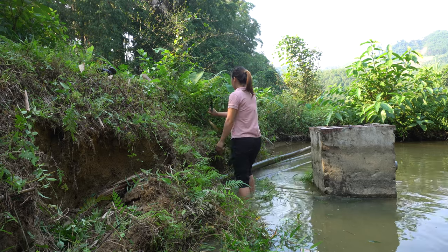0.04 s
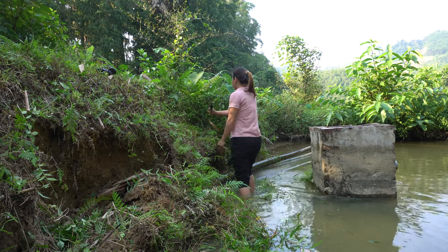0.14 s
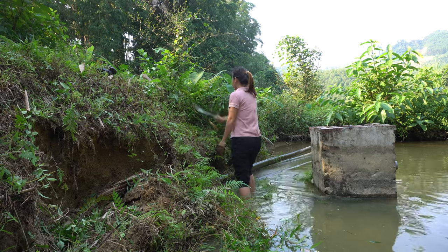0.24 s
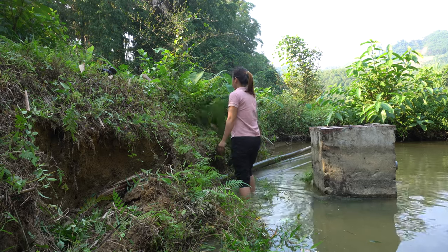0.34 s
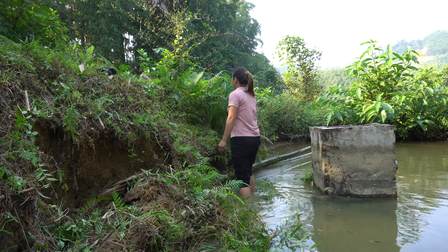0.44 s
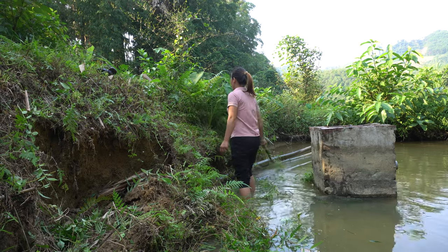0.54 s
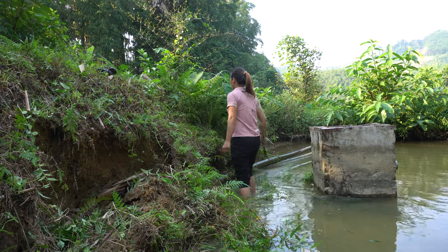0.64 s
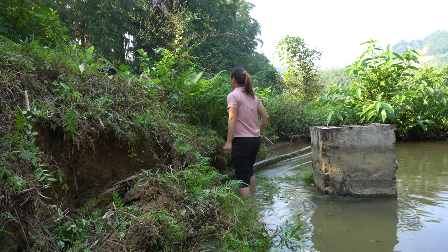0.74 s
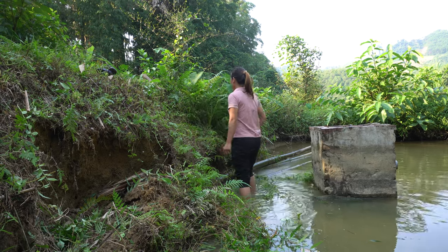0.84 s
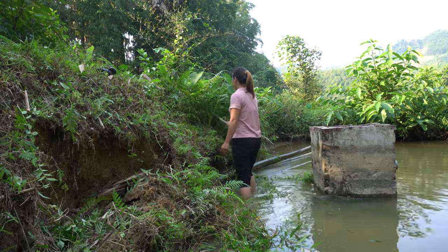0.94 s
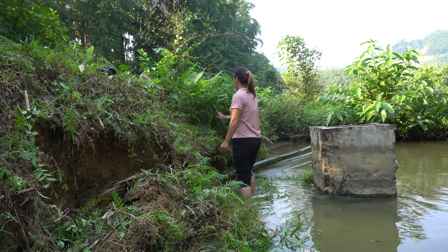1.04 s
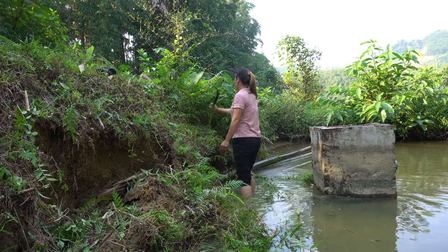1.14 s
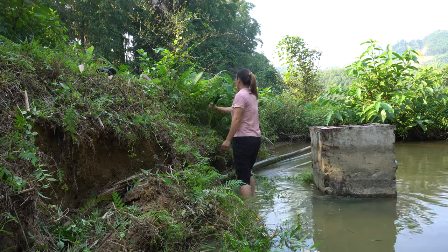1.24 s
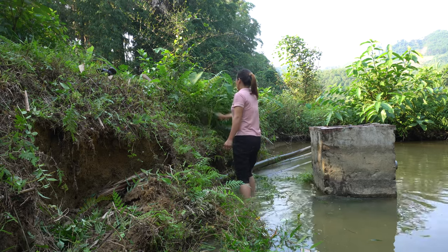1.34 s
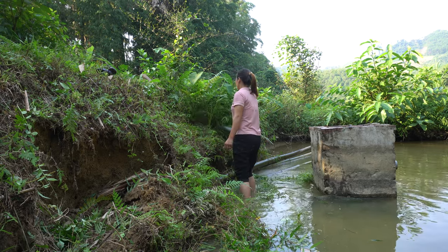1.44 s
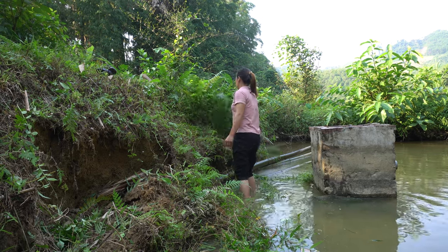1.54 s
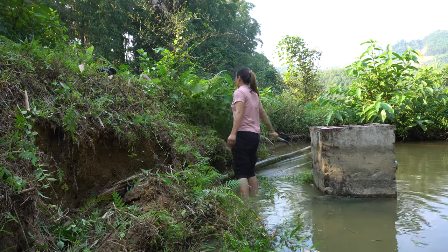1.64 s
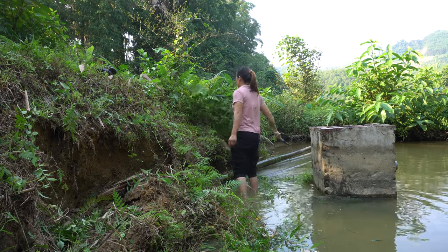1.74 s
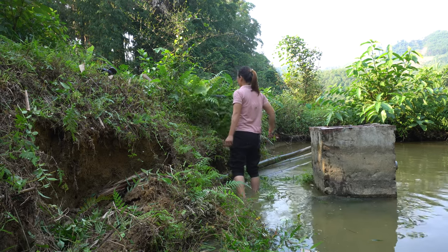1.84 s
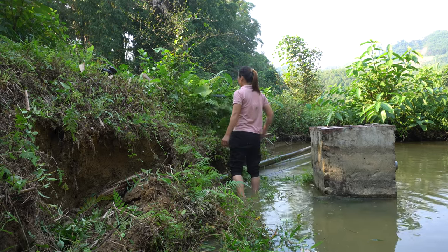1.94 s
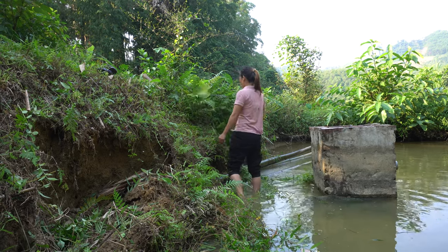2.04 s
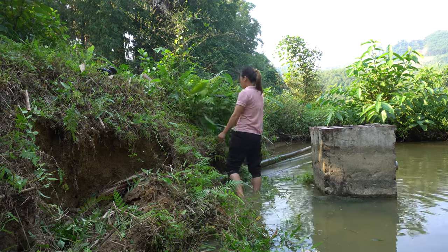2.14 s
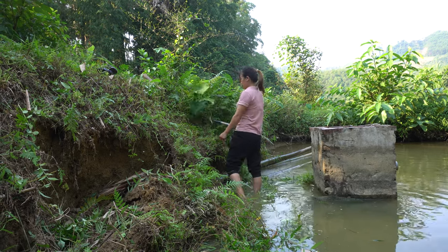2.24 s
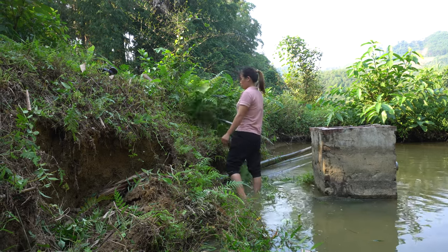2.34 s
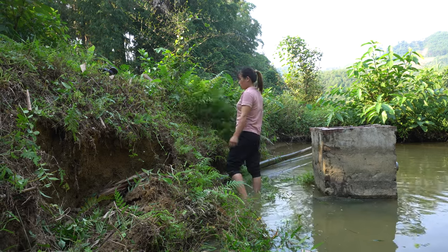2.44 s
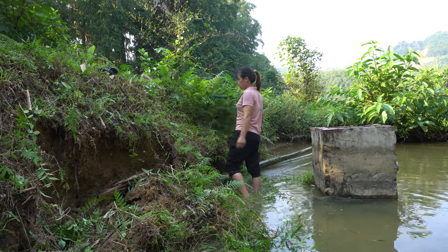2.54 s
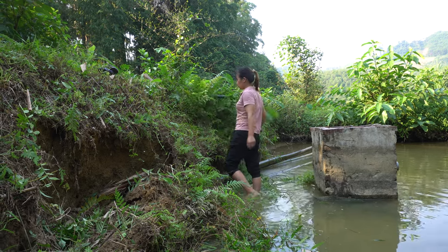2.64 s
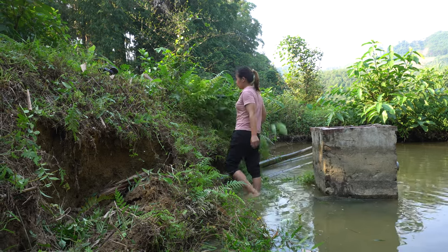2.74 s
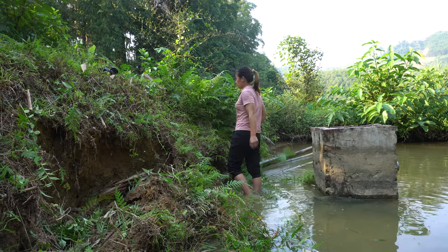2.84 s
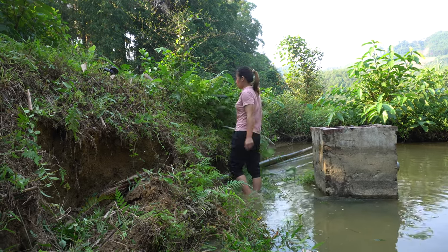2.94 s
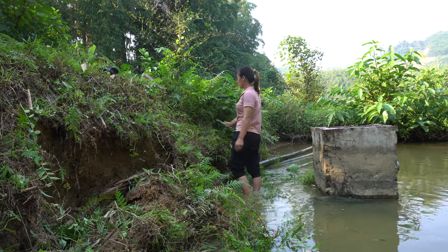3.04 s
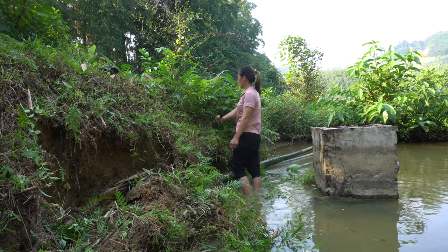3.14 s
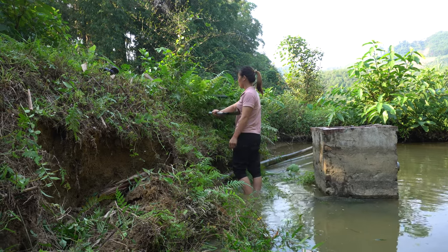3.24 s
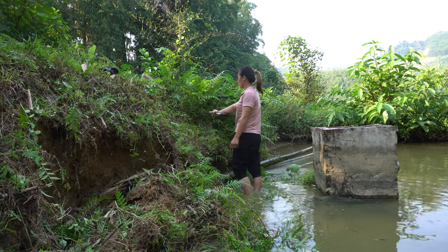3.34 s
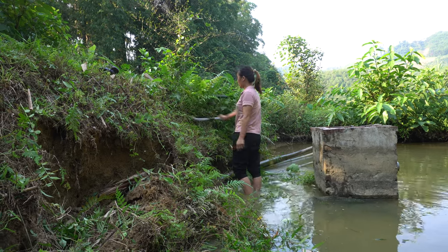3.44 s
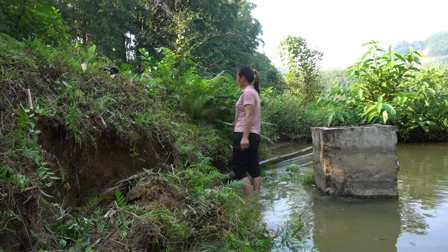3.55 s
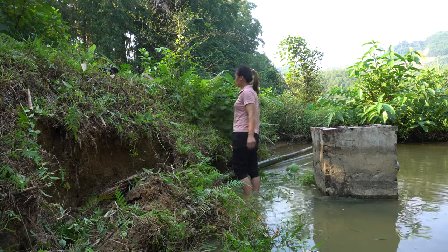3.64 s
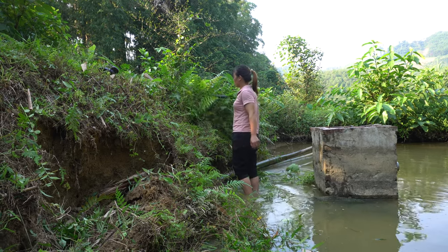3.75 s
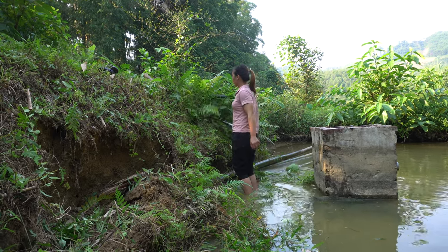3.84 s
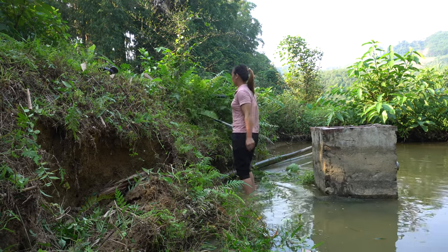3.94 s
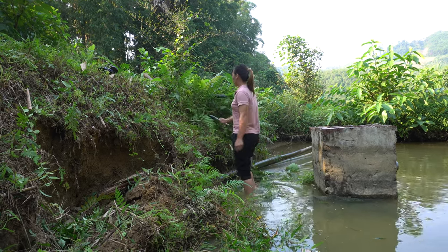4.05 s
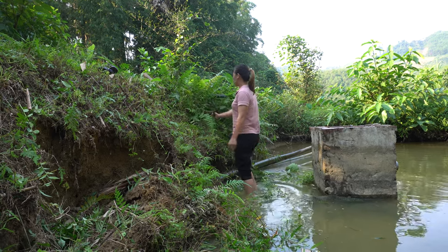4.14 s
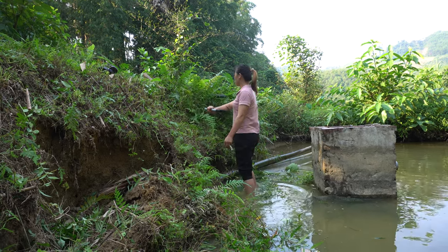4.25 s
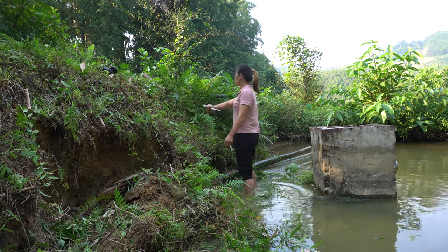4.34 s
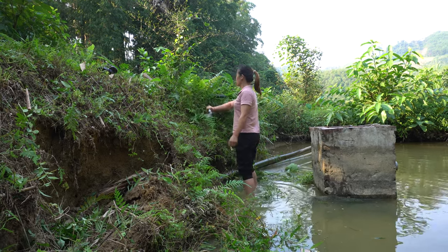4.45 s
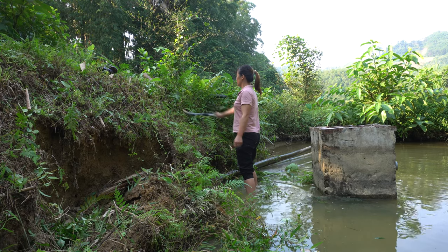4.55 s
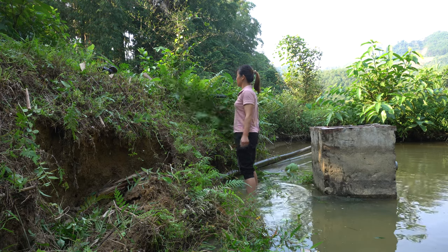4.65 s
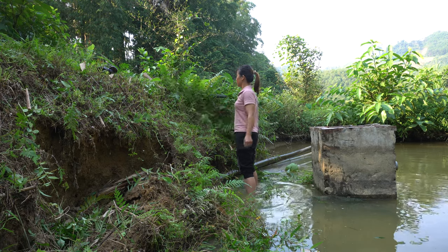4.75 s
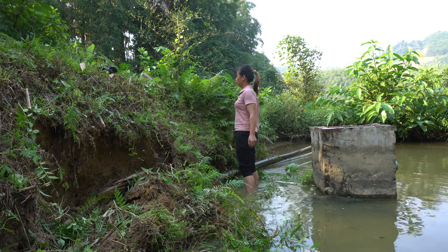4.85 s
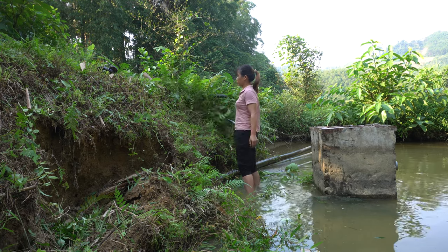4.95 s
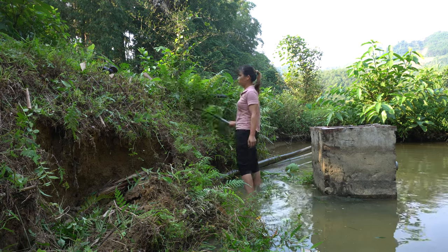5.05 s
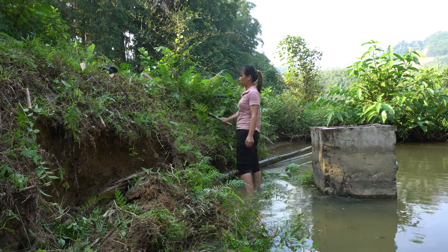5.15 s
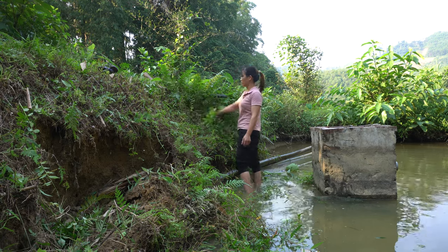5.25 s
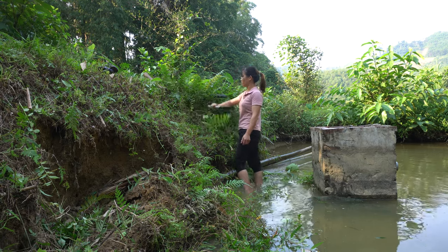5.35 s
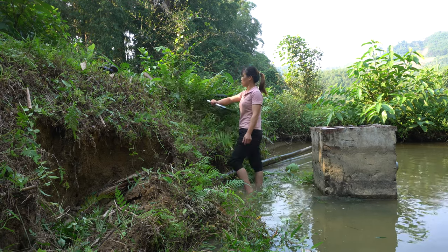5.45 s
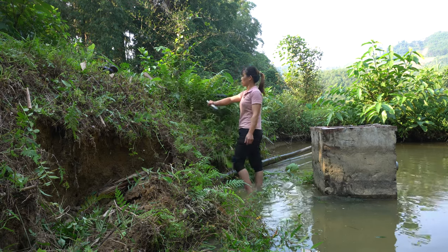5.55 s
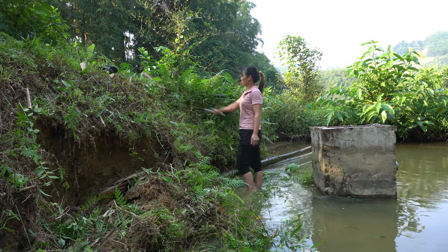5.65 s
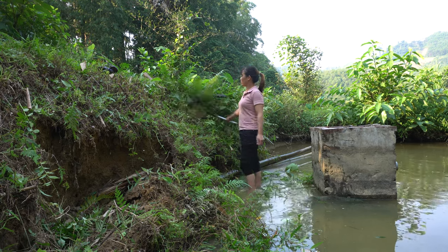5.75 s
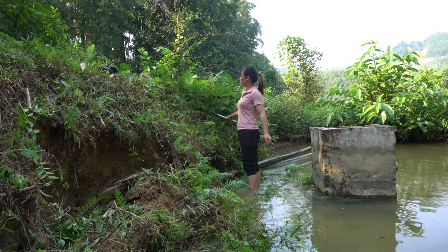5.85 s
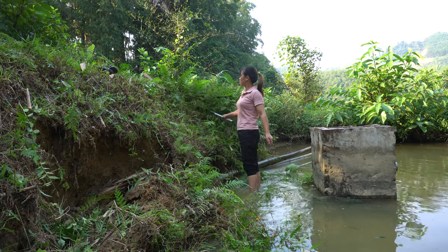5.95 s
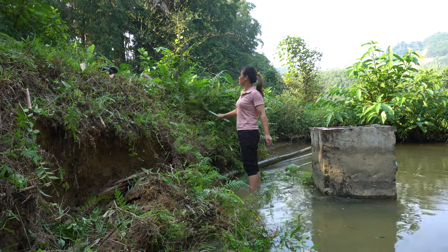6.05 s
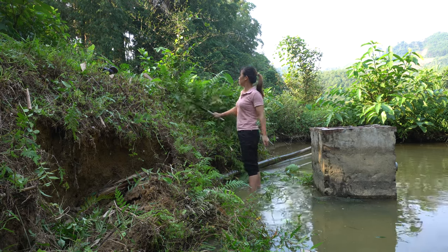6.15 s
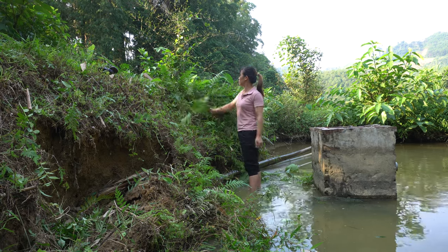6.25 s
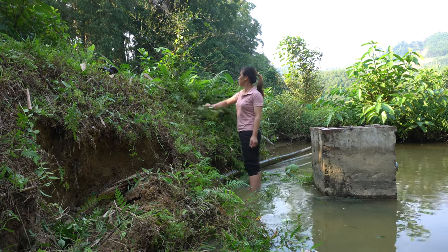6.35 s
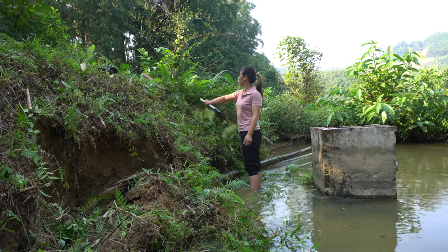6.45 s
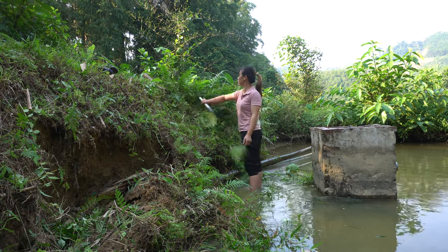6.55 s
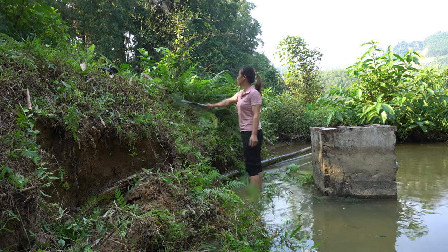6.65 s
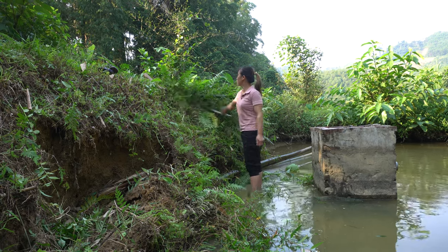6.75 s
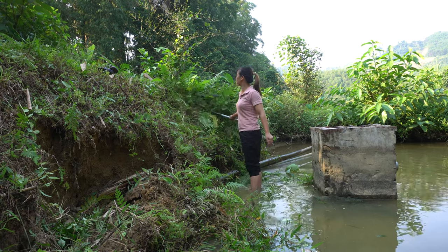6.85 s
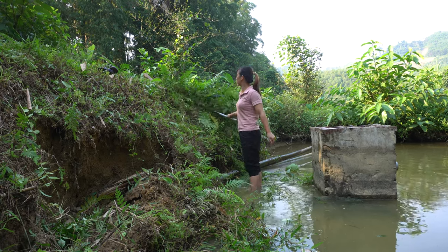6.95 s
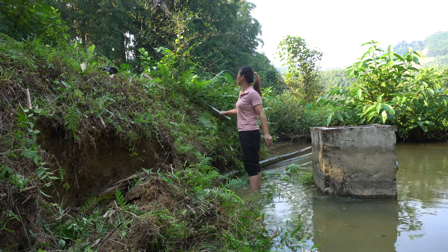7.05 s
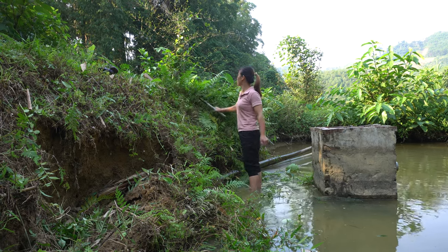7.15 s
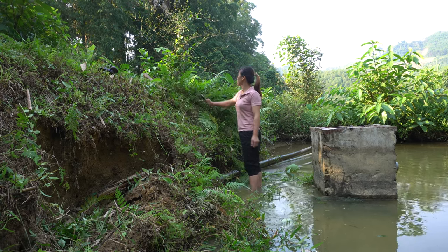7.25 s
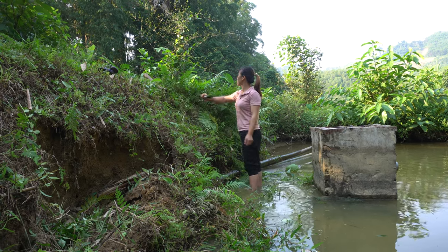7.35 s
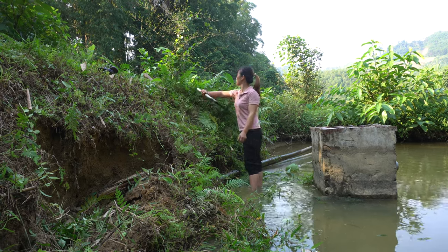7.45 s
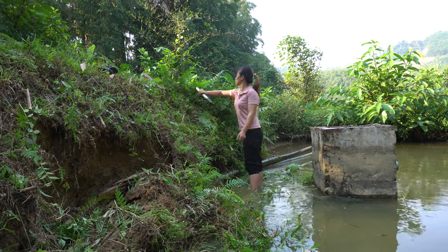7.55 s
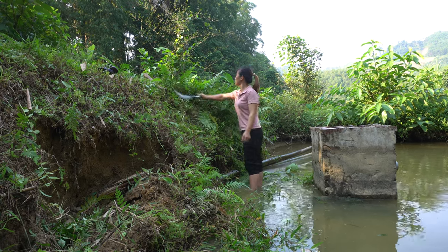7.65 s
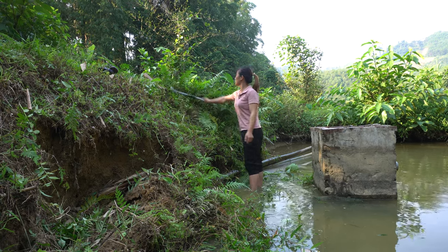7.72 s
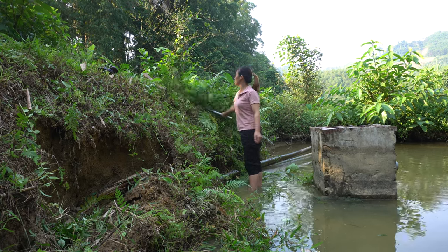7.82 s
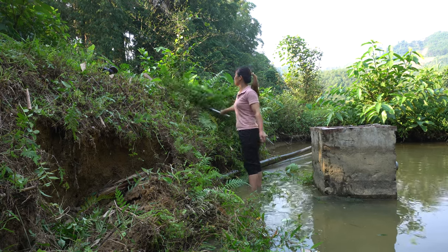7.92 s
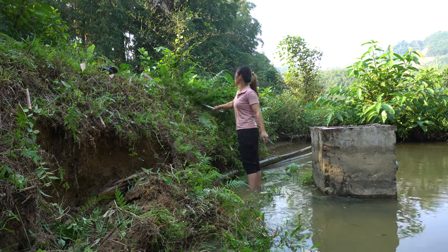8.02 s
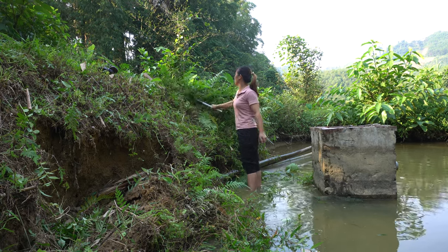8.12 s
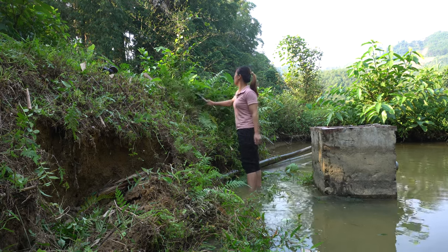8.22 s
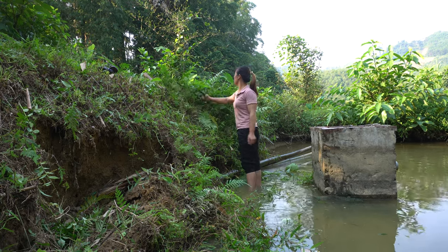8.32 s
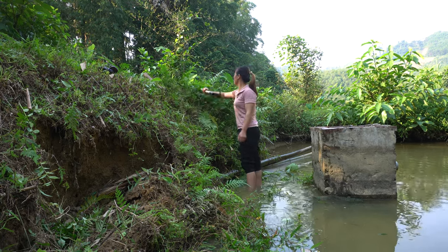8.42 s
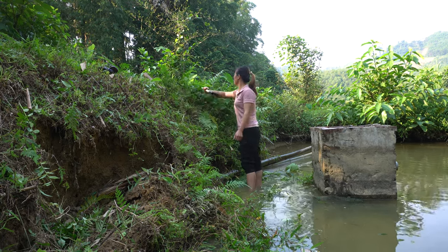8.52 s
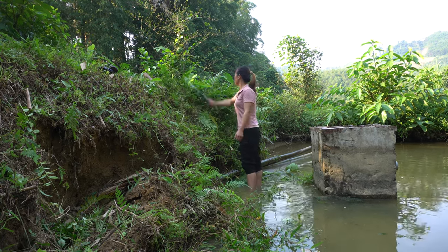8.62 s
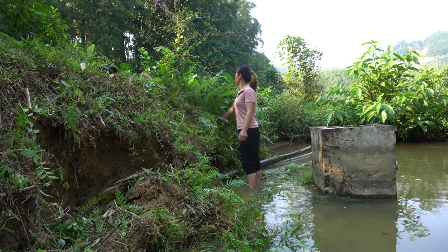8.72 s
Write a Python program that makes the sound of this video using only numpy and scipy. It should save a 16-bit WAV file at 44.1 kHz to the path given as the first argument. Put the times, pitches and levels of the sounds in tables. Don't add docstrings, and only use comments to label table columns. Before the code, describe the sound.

A few metres away and slightly left, a machete chops weeds on an earth bank roughly once a second. Each stroke is a short bright crackle of snapping stems, sometimes with a dull push into soil, followed by falling leaf rustle. Water trickles and gurgles into a hollow tank throughout, drops plop into the pond, and insects hiss faintly around.

```python
import sys
import numpy as np
from scipy import signal
from scipy.fft import rfft, irfft, next_fast_len
from scipy.io import wavfile
from scipy.ndimage import uniform_filter1d, map_coordinates

SR = 44100
rng = np.random.default_rng(int(sys.argv[2]) if len(sys.argv) > 2 else 0)


def voltage_ratio(level):
    return 10 ** (np.asarray(level, float) / 20)


def dump(signal):
    limited = np.clip(np.atleast_2d(signal).T, -1, 1)
    pcm = np.round(limited * 32767).astype(np.int16)
    wavfile.write(sys.argv[1], SR, pcm)


N = 387198


def unit(x):
    return x / np.sqrt(np.mean(x ** 2) + 1e-20)


def along(points, hz):
    f, value = np.transpose(points)
    return np.interp(np.log(hz + 1), np.log(f + 1), value)


def wobble(rate_hz):
    knots = rng.standard_normal(int(N * rate_hz / SR) + 4)
    return map_coordinates(knots, [np.arange(N) * rate_hz / SR])


def filtered(x, response):
    size = next_fast_len(N + 8192)
    return irfft(rfft(x, size) * response(np.fft.rfftfreq(size, 1 / SR)), size)[..., :N]


def resonances(modes):
    def response(f):
        total = 0
        for k, (pitch_hz, width_hz, level_db) in enumerate(modes):
            damping = 1j * f * width_hz
            total = total + (-1) ** k * voltage_ratio(level_db) * damping / (pitch_hz ** 2 - f ** 2 + damping)
        return total
    return response


def swells(rows, rest_db):
    t = np.arange(N) / SR
    power = voltage_ratio(rest_db) ** 2
    for s, db, length in rows:
        power = power + voltage_ratio(2 * db) * np.exp(-((t - s) / length) ** 2)
    return np.sqrt(power)


def crackle(per_s, spread_db, life_s, noise, rows=1):
    when = rng.random((rows, N)) < per_s / SR
    size = np.minimum(rng.exponential(1, (rows, N)), 2.6)
    puffs = signal.lfilter([1], [1, -np.exp(-1 / (life_s * SR))], when * voltage_ratio(spread_db * size))
    hiss = rng.standard_normal((2, rows, N))
    return unit(unit(puffs * hiss[0]) + noise * hiss[1])


def patchy(x, depth_db, bands, frames):
    z = signal.stft(x, nperseg=128)[2]
    field = uniform_filter1d(rng.standard_normal(z.shape[1:]), bands, 0)
    field = uniform_filter1d(field, frames, 1)
    field -= field.mean(0)
    return unit(signal.istft(z * voltage_ratio(depth_db * unit(field)), nperseg=128)[1][:, :N])


def puff(centre_hz, sharp, t60, rows=1):
    t = np.arange(700) / SR
    burst = rng.standard_normal((rows, len(t))) * voltage_ratio(-60 * t / t60)
    band = signal.iirpeak(centre_hz, sharp, SR)
    out = signal.lfilter(*band, signal.lfilter(*band, burst))
    return out / np.abs(out[0]).max()


def bank(x, answer_db):
    t = np.arange(1500) / SR
    echo = rng.standard_normal((2, len(t))) * voltage_ratio(-60 * t / 0.031) * (t > .002)
    return voltage_ratio(answer_db) * signal.fftconvolve(x[None], echo / np.linalg.norm(echo[0]), axes=1)[:, :N]


# frequency_hz, likeness [0 to 1]
LIKENESS = [(60, .995), (200, .99), (400, .88), (800, .88), (1400, .72), (3000, .5), (6800, .25),
            (15000, .45)]


def spread(pair):
    def mid_and_side(hz):
        angle = np.arccos(np.clip(along(LIKENESS, hz), -1, 1)) / 2
        return np.array([np.cos(angle), np.sin(angle)])
    mid, side = filtered(pair, mid_and_side)
    return np.array([mid + side, mid - side])


# frequency_hz, level_db [per Hz]
FAR_HISS = [(15, -41), (25, -14), (69, -12), (152, -10), (227, -14.5), (567, -9.5), (826, -6), (945, -11),
            (2010, -6), (2420, -9.5), (15500, -25.5)]


def surroundings():
    swell = voltage_ratio(.8 * wobble(3))
    hiss = unit(filtered(rng.standard_normal((2, N)), lambda hz: voltage_ratio(along(FAR_HISS, hz))))
    chorus = unit(filtered(rng.standard_normal((2, N)), resonances([(6060, 220, 0)])))
    return spread(voltage_ratio(-43.5) * swell * hiss) + voltage_ratio(-58.0 + 0.59 * wobble(33)) * chorus


def bubbles(count):
    draw, k = rng.random((count, 4)), np.arange(600)
    pitch_hz = 650 * 5 ** draw[:, 1:2]
    cycles = pitch_hz * k / SR
    life = voltage_ratio(-60 * cycles / 22) * (1 - np.exp(-cycles / 0.85))
    notes = life * np.sin(2 * np.pi * cycles * (1 + 0.0093 * cycles))
    notes *= voltage_ratio(-2.5 * np.log(draw[:, 2:3] + 0.11))
    notes *= np.sqrt(pitch_hz)
    where = (draw[:, :1] * N).astype(int) + k
    pan = 2 * draw[:, 3:] - 1
    sides = [np.bincount(where.ravel(), (notes * g).ravel(), N + 600)[:N] for g in (1, pan)]
    return unit(np.array(sides))


# start_s, level_db
STREAM = [(0.0, -55), (0.51, -48), (0.85, -55), (1.46, -51.5), (1.69, -51.5), (2.17, -50), (2.47, -51.5),
          (2.74, -50), (4.08, -56.5), (4.38, -51.5), (5.23, -52), (5.62, -49), (5.87, -54.5), (7.36, -50),
          (7.6, -54.5), (7.95, -55), (8.26, -57), (8.78, -49)]
# pitch_hz, width_hz, level_db
TANK_AIR = [(215, 23.8, 8), (254, 101, -0.5), (145, 68, -13.5)]
# pitch_hz, width_hz, level_db
DEEP_AIR = [(72.8, 5.9, -7), (108, 7.7, -12)]
# pitch_hz, width_hz, level_db
PIPE_AIR = [(749, 17.5, 1), (843, 58, -2.5), (1075, 31, -3), (1854, 280, -7), (2180, 35, -1.5),
            (2866, 270, -5)]
# start_s, level_db, length_s
BOOMS = [
    (1.1, -54, 0.22),
    (1.5, -52, 0.05),
    (2.88, -47.5, 0.051),
    (5.75, -52.5, 0.11),
    (6.31, -51, 0.042),
    (6.73, -49.5, .05),
    (7.8, -47, .07),
    (8.33, -49, 0.11),
]
# start_s, level_db, length_s
TANK_GURGLES = [(.39, -51, .06), (1.02, -60, 0.029), (1.27, -45.5, 0.031), (2.0, -47, 0.41),
                (3.04, -40.5, 0.12), (3.84, -44.5, 0.03), (3.99, -46, 0.017), (4.25, -48, 0.017),
                (4.45, -46, 0.15), (5.0, -45.5, 0.033), (5.96, -42.5, 0.031), (6.4, -43.5, 0.093),
                (6.93, -48, 0.14), (8.29, -43, 0.029)]


def tank():
    flow_db = np.interp(np.arange(N) / SR, *np.transpose(STREAM))
    lumps = rng.standard_normal((2, N))
    boom = unit(filtered(lumps, lambda hz: resonances(DEEP_AIR)(hz) / (1 + (hz / 140) ** 4)))
    boom = swells(BOOMS, rest_db=-57.5) * voltage_ratio(1.6 * wobble(4.4)) * boom
    surge = voltage_ratio(1.5 * wobble(14))
    hum = unit(filtered(lumps * surge, lambda hz: resonances(TANK_AIR)(hz) / (1 + (hz / 330) ** 4)))
    hum = voltage_ratio(flow_db + 3 + 2.2 * wobble(6)) * hum
    splashes = crackle(per_s=350, spread_db=3, life_s=.003, noise=1.1, rows=2)
    splash = unit(filtered(splashes + .42 * bubbles(count=1400), resonances(PIPE_AIR)))
    splash_gain = voltage_ratio(0.15 * (flow_db - flow_db.mean()) + 1.3 * wobble(9))
    splash = swells(TANK_GURGLES, rest_db=-48.5) * splash_gain * patchy(splash, 2.5, 1, 40)
    return spread(boom + hum + splash)


# start_s, level_db [peak], pitch_hz [bubble]
BIG_DROPS = [(0.0884, -21.5, 2110), (1.251, -20, 2450), (1.6593, -24, 1950), (2.2504, -27, 2100),
             (2.429, -22, 1640), (2.6554, -25.5, 2800), (3.037, -28, 3100), (3.7654, -25, 2060),
             (3.7835, -21.5, 3150), (4.185, -22, 2610), (4.2735, -24, 1900), (4.299, -25, 1500),
             (4.5883, -27, 2100), (5.1424, -23, 2650), (5.1675, -17.5, 3020), (5.201, -23, 2050),
             (5.2938, -23, 3040), (5.3533, -21, 2820), (5.5247, -24.5, 2240), (6.0928, -16.5, 3770),
             (6.353, -18, 3240), (6.419, -20.5, 2920), (6.6077, -19, 2740), (6.647, -25, 3030),
             (7.2648, -22.5, 3550), (8.0134, -17, 3280), (8.3109, -20.5, 1720), (8.3586, -24.5, 2930),
             (8.4067, -12.5, 1950), (8.471, -27, 2180)]
# start_s, level_db [peak], pitch_hz [tick]
SMALL_DROPS = [(.0234, -40.5, 5040), (.132, -42.5, 4200), (.214, -39, 5700), (.7047, -36, 9790),
               (.7158, -36, 4310), (.8094, -39, 7300), (1.3433, -42, 6140), (1.8087, -36.5, 4870),
               (2.3267, -35.5, 6750), (2.37, -34, 9560), (4.3344, -40, 6900), (4.4774, -39, 8970),
               (4.849, -37.5, 4010), (4.9553, -37.5, 6360), (1.2516, -38.5, 4480), (5.6547, -43, 5320),
               (5.676, -36, 5290), (6.1469, -39.5, 4220), (6.5545, -40, 8040), (6.938, -37.5, 6340),
               (7.1131, -40, 4530), (7.1625, -37, 5970), (7.5153, -36, 5700), (7.631, -36.5, 8650),
               (8.111, -39, 5400), (8.1808, -34.5, 4910), (8.5008, -39.5, 4080), (8.5503, -38.5, 6200),
               (8.6054, -35.5, 9000), (8.649, -41, 7820)]
# start_s, level_db [peak], pitch_hz [tick]
FINE_SPRAY = [(0.1954, -31, 4270), (0.55, -30, 10700), (0.6778, -34, 8340), (0.9012, -33, 9780),
              (1.023, -30, 9080), (1.0435, -31, 4660), (1.1086, -28.5, 9170), (1.9848, -31, 5220),
              (2.09, -29, 6300), (2.2706, -34, 5580), (2.7768, -28.5, 5140), (2.9012, -33, 9550),
              (3.1008, -30, 8340), (3.1217, -30.5, 6210), (4.1727, -26, 10400), (4.9984, -29.5, 6150),
              (5.0728, -31, 11500), (5.212, -31, 8930), (5.3836, -31, 5670), (5.918, -27, 9600),
              (5.971, -34, 4710), (6.299, -29, 5980), (6.4564, -29, 5170), (7.1406, -29, 5900),
              (7.2543, -32, 4000), (7.2914, -29.5, 4920), (7.402, -32, 5610), (7.6888, -31, 5450),
              (8.0957, -28, 8240), (8.289, -28.5, 4670)]


def all_drops():
    rows = []
    for s, db, hz in BIG_DROPS:
        rows.append((s, db, hz, -37 + 0.1 * (db + 7.5), 6200 * voltage_ratio(rng.normal(0, 1.4))))
    spray = [(s, db - 10.5, hz) for s, db, hz in FINE_SPRAY]
    for s, db, hz in SMALL_DROPS + spray:
        bubble_db = db + 6 + rng.normal(0, 3.6)
        rows.append((s, bubble_db, 2220 * voltage_ratio(rng.normal(0, 2.3)), db, hz))
    return rows


def drops():
    out, t = np.zeros((2, N + SR)), np.arange(700) / SR
    mid_side = np.array([[1], [.3]])
    for s, db, bubble_hz, tick_db, tick_hz in all_drops():
        cycles = bubble_hz * t
        life = (1 - np.exp(-cycles / .35)) * np.exp(-(cycles / 3.8) ** 2)
        bubble = life * np.sin(2 * np.pi * cycles * (0.796 + 0.065 * cycles))
        tick = puff(tick_hz, sharp=1.0, t60=.02, rows=2)
        mist = voltage_ratio(-10 + rng.normal(0, 4)) * puff(13000, sharp=1.2, t60=.014, rows=2)
        here = out[:, round(s * SR):][:, :len(t)]
        here[0] += voltage_ratio(db - 3.0) * bubble
        here += voltage_ratio(tick_db + 10.5) * (tick + mist) * mid_side
    mid, side = out
    return np.array([mid + side, mid - side])[:, :N] + bank(mid, answer_db=-2.5)


# start_s, level_db [peak], t60_s
EARTH_HITS = [
    (0.334, -34.5, 0.98),
    (1.468, -29, 0.48),
    (2.986, -38, 0.12),
    (3.553, -41, 0.36),
    (4.639, -43, 0.16),
    (5.74, -42, 0.13),
    (6.728, -36, 0.68),
    (7.788, -33, 0.78),
    (8.711, -35, 0.16),
]


def thuds():
    out, t = np.zeros(N + SR), np.arange(9000) / SR
    dull = signal.butter(2, [95, 330], "bandpass", fs=SR, output="sos")
    for s, db, t60 in EARTH_HITS:
        push = rng.standard_normal(len(t)) * voltage_ratio(-60 * t / t60) * (1 - np.exp(-t / 0.0025))
        push = signal.sosfilt(dull, push)
        out[round(s * SR):][:len(t)] += voltage_ratio(db) * push / np.abs(push).max()
    return out[:N]


# frequency_hz, left_minus_right_db
LEFT_TILT = [(60, 8), (150, -2), (380, 4), (950, -0.5), (2380, 0.5), (5980, 6), (15000, 2.5)]


def leftward(mono, scatter):
    tilt = lambda hz: voltage_ratio(along(LEFT_TILT, hz) / 2 * np.array([[1], [-1]]))
    return filtered(np.array([mono + scatter, mono - scatter]), tilt)


# start_s [bite], level_db [crackle at bite], rise_s, drag_s, leave_db [crackle as blade leaves]
SLASHES = [
    (0.363, -23, 0.023, 0.16, -40),
    (1.467, -23, 0.019, 0.052, -24.5),
    (2.52, -35, 0.3, 0.26, -47),
    (3.558, -22.5, 0.016, 0.088, -30),
    (4.639, -21, 0.045, .11, -33.5),
    (5.733, -25, 0.043, 0.051, -22),
    (6.734, -21, 0.056, 0.11, -31.5),
    (7.777, -24.5, 0.034, .07, -23),
    (8.732, -20.5, 0.037, 0.053, -27),
]


def stroke_gains():
    gains, t = np.zeros((3, N)), np.arange(N) / SR
    touch_db, leave_db_per_s, settle_db_per_s = -53.5, 240, 41
    for s, bite_db, rise, drag, leave_db in SLASHES:
        times = [s - 2 * rise, s, s + drag, s + drag + 1]
        levels = [2 * touch_db - bite_db, bite_db, leave_db, leave_db - leave_db_per_s]
        db = np.interp(t, times, levels)
        after = np.maximum(t - s, 0)
        gains[0] += voltage_ratio(db + 1.5 * np.exp(-after / 0.019))
        gains[1] += voltage_ratio(db - 6.5 - 3 * np.exp(-after / 0.077))
        settle_db = -39 + 0.64 * (bite_db + 21.5)
        gains[2] += (t > s) * voltage_ratio(settle_db - settle_db_per_s * np.maximum(after - drag, 0))
    return gains


# frequency_hz, level_db [per Hz]
STEM_COLOUR = [(59, -42), (100, -6.5), (220, 2), (380, -14), (500, -1.5), (790, 0.5), (1300, -2.5),
               (2600, 2), (3700, -2.5), (6000, -4.5), (9500, -4), (12500, -4.5), (14500, -3.5), (15800, -8)]
# start_s, level_db, length_s
LEAF_BRUSHES = [(.75, -47, 0.052), (1.598, -34.5, 0.024), (2.05, -44.5, 0.075), (3.0, -45.5, 0.1),
                (4.15, -60, 0.16), (5.15, -49.5, 0.25), (6.09, -41, 0.12), (7.2, -51.5, 0.22),
                (8.11, -47, 0.032), (8.146, -38, 0.022), (1.0, -62, 0.052), (2.8, -51.5, .1)]


def foliage():
    breaks = crackle(per_s=900, spread_db=2.5, life_s=.0001, noise=1.8, rows=2)
    breaks = patchy(breaks, 2.6, 9, 6) * voltage_ratio(1.3 * wobble(55))
    brushes = crackle(per_s=70, spread_db=2.8, life_s=.004, noise=1.2, rows=2)
    brushes = patchy(brushes, 3.5, 12, 7)
    low = lambda hz: 1 / (1 + (hz / 3600) ** 6)
    colour = lambda hz: voltage_ratio(along(STEM_COLOUR, hz))
    treble = lambda x: unit(filtered(x, lambda hz: colour(hz) * (1 - low(hz))))
    body = unit(filtered(breaks, lambda hz: colour(hz) * low(hz)))
    crackle_gain, body_gain, settling = stroke_gains()
    rustle = np.hypot(settling, swells(LEAF_BRUSHES, rest_db=-51)) * treble(brushes)
    cut = crackle_gain * treble(breaks) + body_gain * body
    return leftward(cut[0] + rustle[0], 0.11 * cut[1] + 0.36 * rustle[1])


# start_s, level_db [peak], pitch_hz
STEM_SNAPS = [(0.335, -29, 2090), (0.3604, -9.5, 8800), (0.374, -9.5, 8800), (1.4551, -17, 11000),
              (1.4665, -30, 8670), (1.487, -10, 1720), (1.5054, -13, 4230), (2.427, -18.5, 9510),
              (2.533, -33, 4260), (2.97, -23.5, 1340), (2.983, -15.5, 2400), (2.9945, -17.5, 1700),
              (3.003, -16, 1510), (3.551, -16, 9000), (3.563, -9.5, 7900), (3.5775, -18, 3200),
              (4.627, -17, 5670), (4.665, -19, 2620), (5.71, -21, 9430), (5.7233, -21, 4950),
              (5.7734, -29, 2050), (6.71, -14.5, 9140), (6.736, -11, 9290), (6.79, -14, 2170),
              (6.853, -19, 5270), (7.7653, -19, 10500), (7.7864, -14, 9190), (8.7205, -21, 5980),
              (8.7292, -15.5, 2000), (8.7358, -11, 1920)]


def snaps():
    out = np.zeros(N + SR)
    for s, db, ring_hz in STEM_SNAPS:
        crack = puff(ring_hz, sharp=1.1, t60=.013)[0]
        out[round(s * SR):][:len(crack)] += voltage_ratio(db) * crack
    return leftward(out[:N], 0) + bank(out, answer_db=-8)


def scene():
    return surroundings() + tank() + drops() + thuds() + foliage() + snaps()


def band_limit(x):
    return signal.sosfilt(signal.butter(12, 16860, fs=SR, output="sos"), x)


def record(dry):
    top_hz = 15850
    mix = filtered(dry, lambda hz: hz < top_hz)
    return band_limit(mix)


dry = scene()
out = record(dry)
dump(out)
```